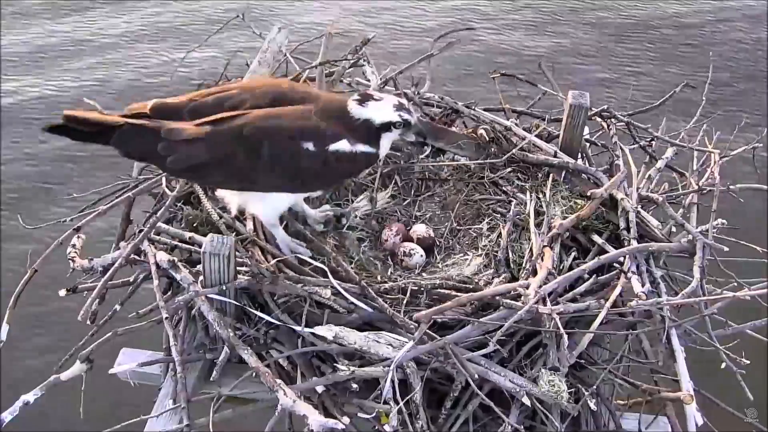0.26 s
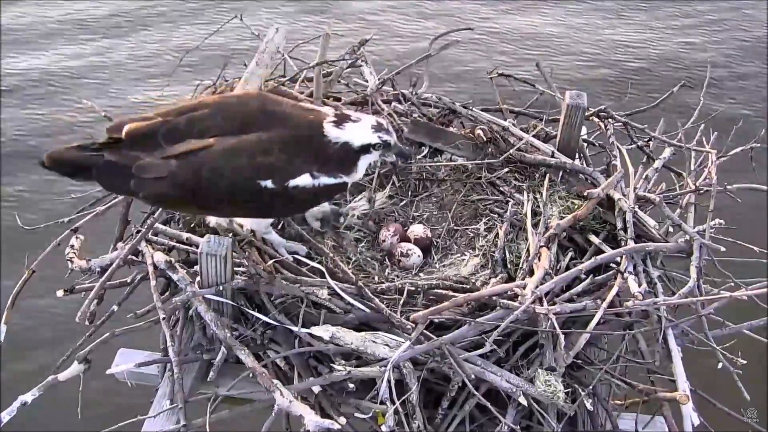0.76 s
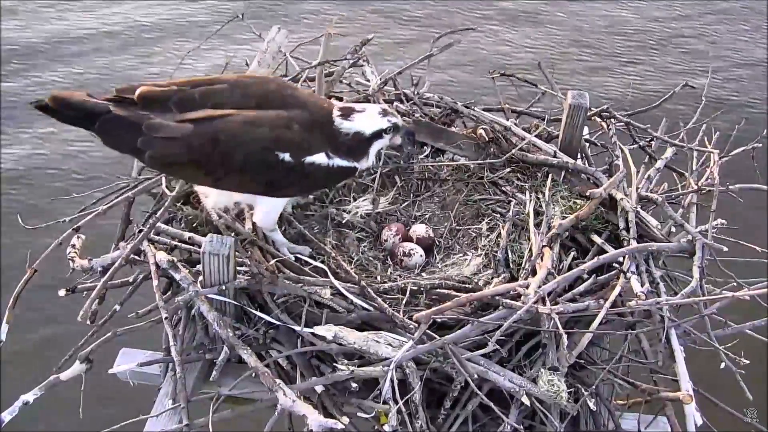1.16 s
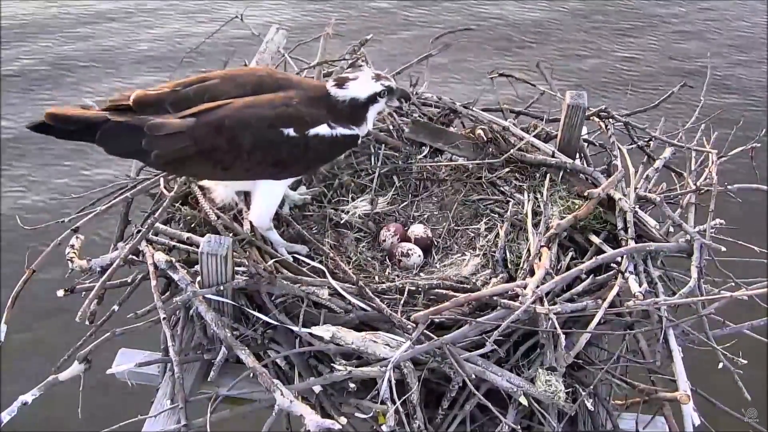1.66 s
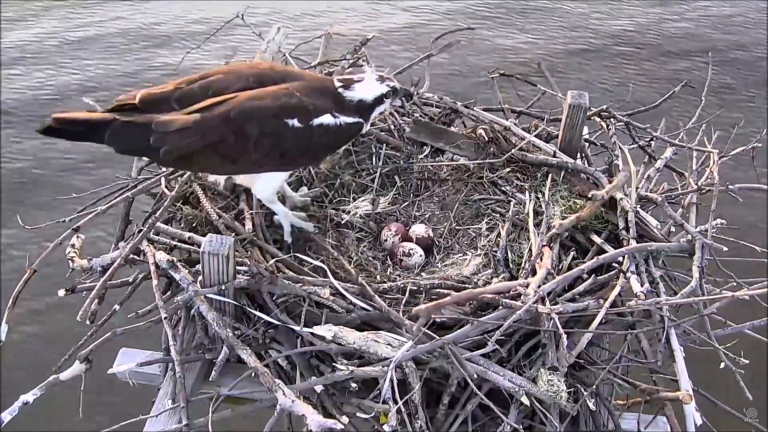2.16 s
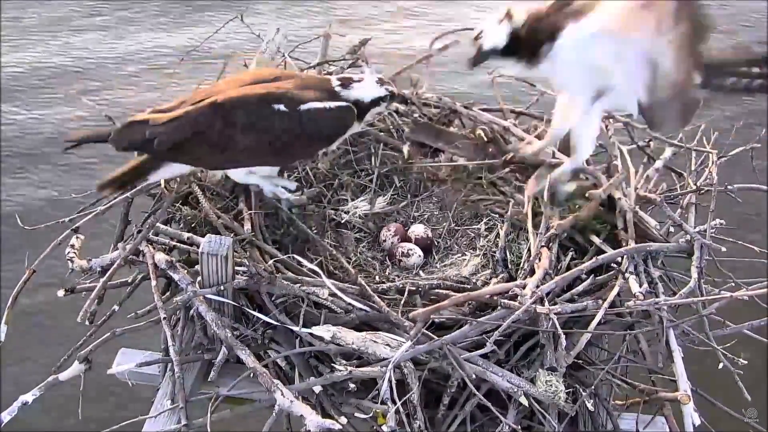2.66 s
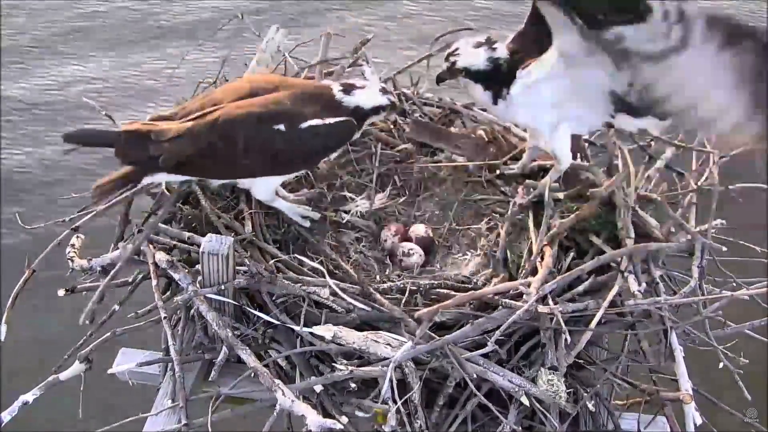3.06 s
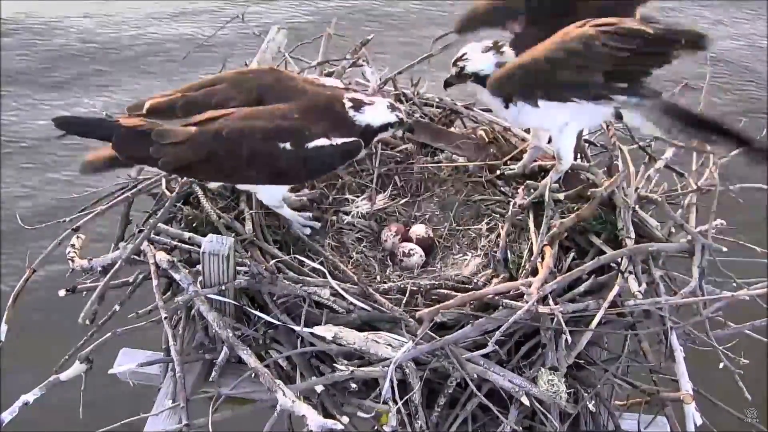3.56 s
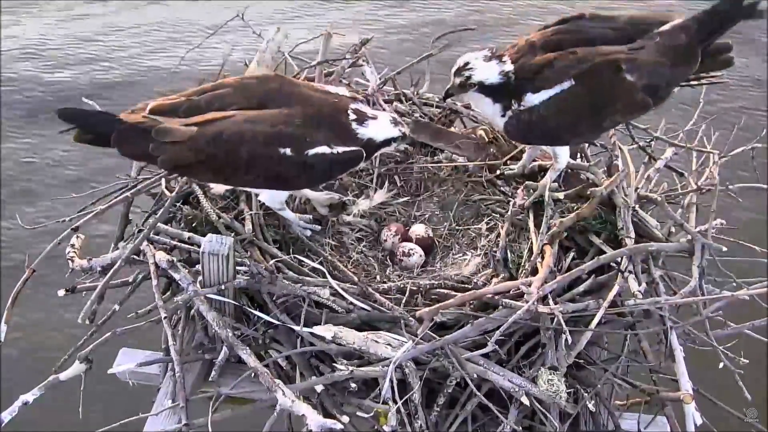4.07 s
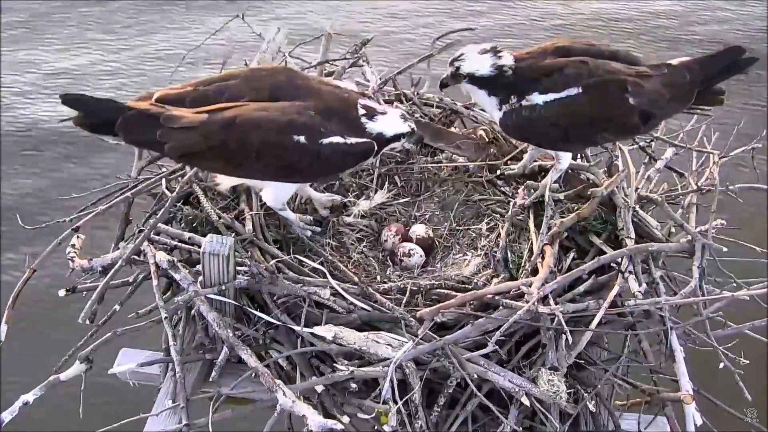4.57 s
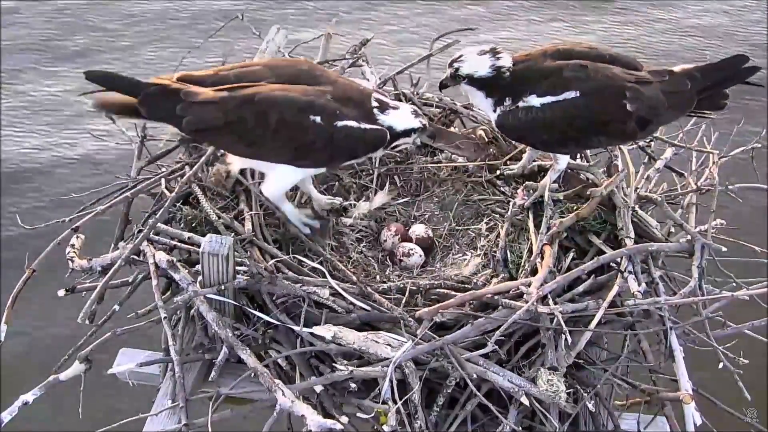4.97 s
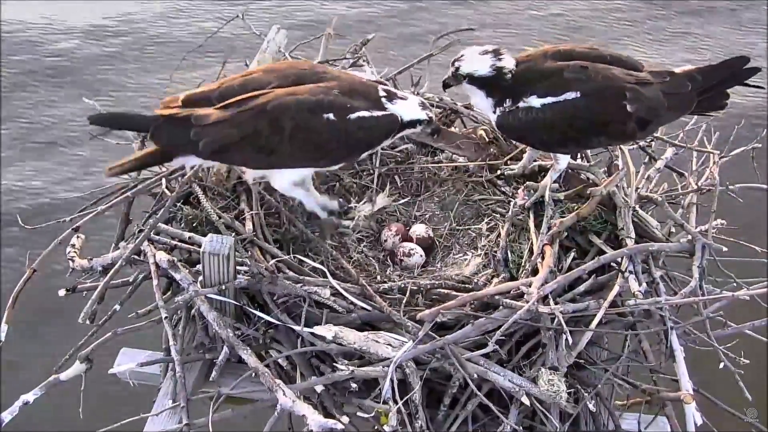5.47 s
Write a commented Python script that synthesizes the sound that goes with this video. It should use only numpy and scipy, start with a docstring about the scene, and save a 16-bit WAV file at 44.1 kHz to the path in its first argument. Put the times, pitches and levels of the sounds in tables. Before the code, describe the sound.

A large bird of prey calls from a stick nest over open water, close and clear. From 0 to about 3.4 s come fourteen high, piercing chirps, evenly spaced at a quarter second. Each lasts about a tenth of a second: a rounded whistle around 2.5-3 kHz, a quick bright downward snap from above 4 kHz, then a short falling close. From 1.5 s the closes turn raspier and higher. A brief soft rustle passes at 0.4 s; from 2.1 to 3.1 s dry sticks and feathers rustle faintly as a second bird lands, with a tiny twig snap at 2.1 s. From 3.5 s seven longer whistles follow, around 0.2 s each, husky, rising, sagging, rising again and dropping, with gaps widening; the last ones, near 5.0 and 5.3 s, are lower. Another small snap comes at 5.2 s. A very quiet dull outdoor wash and faint low hum continue throughout, almost without echo.

```python
"""A bird of prey calls at its stick nest above open water: fast chirps that slow into long whistles.
Each call is a tone bent towards the resonances of the windpipe, with overtones and husky breath.
As a second bird lands, sticks and feathers rustle: filtered noise that swells, plus a few twig snaps.
Behind lie a dull outdoor wash of shaped noise and a faint hum of wavering low tones."""
import sys
import numpy as np
from scipy import signal
from scipy.fft import rfft, irfft, next_fast_len
from scipy.io import wavfile
from scipy.ndimage import uniform_filter1d, map_coordinates

SR = 44100
rng = np.random.default_rng(int(sys.argv[2]) if len(sys.argv) > 2 else 0)


def inscribe(sig):
    """Save sig as 16-bit PCM at rate SR to the path in sys.argv[1].

    A 1-D sig is mono; a 2-D sig holds one channel per row.
    Samples are clipped to [-1, 1] before scaling.
    """
    pcm = np.round(np.clip(np.atleast_2d(sig).T, -1, 1) * 32767)
    wavfile.write(sys.argv[1], SR, pcm.astype(np.int16))


def gain_from_db(level_db):
    """Convert decibel levels to linear amplitude factors (20 dB per decade)."""
    decades = np.asarray(level_db, float) / 20
    return 10 ** decades


N = 251370  # length [samples]


def unit(x):
    """Scales a sound to an rms of 1."""
    return x / np.sqrt(np.mean(x ** 2) + 1e-20)


def along(points, hz):
    """Reads a curve of (frequency [Hz], value) points on a logarithmic frequency axis."""
    f, v = np.transpose(points)
    return np.interp(np.log(hz + 1), np.log(f + 1), v)


def over_time(s, value):
    """Joins values at the times s [s] by straight lines, one value per sample."""
    return np.interp(np.arange(N) / SR, s, value)


def wobble(rate):
    """A smooth random curve with rate random knots a second."""
    knots = rng.standard_normal(int(N * rate / SR) + 4)
    return map_coordinates(knots, [np.arange(N) * rate / SR])


def coloured(x, spectrum):
    """Filters x so that each frequency gets the gain of a (frequency [Hz], level [dB]) curve."""
    m = next_fast_len(N + 8192)  # spare room, so that the end does not wrap round to the start
    gain = gain_from_db(along(spectrum, np.fft.rfftfreq(m, 1 / SR)))
    return irfft(rfft(x, m) * gain, m)[:N]


def outdoors():
    """Far water and wind as shaped noise, with a low hum of tones that waver in level and phase."""
    # balance of the wash: (frequency [Hz], relative level [dB])
    wash_shape = [(90, -27), (164, -15.5), (300, -6.5), (800, -6.5), (1700, -15.5), (4600, -14),
                  (8200, -23), (15800, -22)]
    # tones of the hum: (frequency [Hz], usual peak level [dB])
    hum_tones = [(275, -96.5), (342, -93), (411, -91.5)]
    wash = unit(coloured(rng.standard_normal(N), wash_shape)) * gain_from_db(-80.5 + 1.5 * wobble(3.1))
    t = np.arange(N) / SR
    hum = sum(gain_from_db(db + 1.6 * wobble(15.0)) * np.sin(2 * np.pi * hz * t + wobble(4.6)) for hz, db in hum_tones)
    return wash + hum


def nest():
    """Stick on stick: clumped grains of noise that swell and fade, and a few clear snaps."""
    # loudness of sticks and feathers: (time [s], level [dB])
    rustle = [(0.382, -89), (0.419, -65.5), (0.471, -83.5), (2.102, -76.5), (2.402, -70), (2.948, -70),
              (3.151, -84), (5.7, -94)]
    # how twigs colour the noise: (frequency [Hz], gain [dB])
    twigs = [(1200, -46), (2300, -14), (5300, -7), (9300, -22), (13000, -42.5)]
    # twig snaps: (time [s], level before the crack's lift and the twig colour [dB])
    snaps = [(2.105, -44), (5.164, -39.5)]
    grains = rng.standard_normal(N) * gain_from_db(2.5 * wobble(40) + 3 * wobble(500))
    bed = unit(coloured(grains, twigs)) * gain_from_db(over_time(*np.transpose(rustle)))
    t = np.arange(N) / SR
    crack = gain_from_db(9) * rng.standard_normal(N)
    # each snap starts at once and fades by 60 dB in 4 ms
    snap_levels = sum(gain_from_db(db - 60 * np.abs(t - s) / .004) * (t >= s) for s, db in snaps)
    return bed + coloured(crack * snap_levels, twigs)


def echoes(x):
    """Sticks, post and water give back a short tail: noise that fades by 60 dB in 64 ms."""
    t = np.arange(SR // 4) / SR
    tail = rng.standard_normal(len(t)) * gain_from_db(-60 * t / 0.064) * (t > .002)
    return signal.fftconvolve(x, tail / np.linalg.norm(tail))[:N]


def husk():
    """Breath noise that rings in the resonances of the windpipe, with a grainy level."""
    # resonances that colour the breath: (centre [Hz], width [Hz], level before squaring [dB])
    breath_peaks = [(2354, 230, -4), (3185, 210, 0.5), (3786, 1100, 4.5), (4917, 440, -1.5),
                    (5980, 350, -5)]
    f = np.fft.rfftfreq(N, 1 / SR)
    pipe = sum(gain_from_db(db) * 1j * f * width / (hz * hz - f * f + 1j * f * width)
               for hz, width, db in breath_peaks)
    # the sum is squared in size, and the top is dulled
    response = pipe * np.abs(pipe) / (1 + (f / 6800) ** 8)
    breath = irfft(rfft(rng.standard_normal(N)) * response, N)
    return unit(breath) * gain_from_db(2 * wobble(30))


def slackened(note, next_s):
    """The membrane slackens after a note: a fading tail slides down before the next one starts."""
    s, tension_hz, effort_db = note[-1]
    slack_s = .016  # a full tail; a near next note leaves only a share of it
    share = np.clip((next_s - s - .003) / slack_s, .01, 1)
    tail = (s + slack_s * share, tension_hz * (1 - 0.22 * share), effort_db - 25.5 * share)
    return list(note) + [tail]


def bird(sung):
    """A membrane's whistle, pulled to the windpipe's resonances, with overtones, half-pitch lines and breath."""
    # the windpipe pulls the pitch to its resonances: (tension [Hz], sounding pitch [Hz])
    pull = [(1600, 1600), (2350, 2200), (2400, 2500), (2600, 2830), (3280, 3220), (3430, 3600),
            (3920, 3920), (4030, 4150), (4500, 4450), (6300, 6300)]
    # weak spots between the resonances: (centre [Hz], width [Hz], level [dB])
    gaps = [(2352, 222, -18), (3410, 89, -12), (4087, 56, -15.5)]
    # what throat and beak pass of the overtones: (frequency [Hz], gain [dB])
    throat = [(1500, -29.5), (2200, -7), (4200, 7), (6000, -16.5), (7600, -24.5), (8300, -30), (9000, -43),
              (10000, -69.5)]
    # how much every second cycle differs on the low whistle: (time [s], level [dB])
    doubling = [(0, -9), (2.499, -12.5), (3.203, -16.5), (4.8, -21.5), (5.199, -19), (5.7, -14.5)]
    # huskiness beside the whistle: (time [s], level [dB])
    huskiness = [(0, -24), (0.899, -23.5), (1.6, -19), (2.4, -20.5), (3.2, -19), (3.9, -20), (4.5, -21.5),
                 (4.901, -20.5), (5.7, -22)]

    def smooth(x):
        return uniform_filter1d(x, size=80)

    def partial(order, db):
        gain = gain_from_db(db + along(throat, order * hz) + 3 * wobble(60))
        return gain * np.sin(order * phase)

    followers = sung[1:] + [[(N / SR,)]]
    notes = [slackened(note, after[0][0]) for note, after in zip(sung, followers)]
    s, tension_hz, effort_db = np.transpose(sum(notes, []))
    hz = smooth(np.interp(over_time(s, tension_hz), *np.transpose(pull)))
    # the voice breaks off between the notes
    edges_s = [note[end][0] for note in notes for end in (0, 0, -1, -1)]
    sounding = over_time(edges_s, [0, 1, 1, 0] * len(notes))
    effort = smooth(smooth(gain_from_db(over_time(s, effort_db)) * sounding))
    gap_db = sum(db * np.exp(-((hz - centre) / width) ** 2) for centre, width, db in gaps)
    unsteady = gain_from_db(over_time(*np.transpose(doubling)))
    # an unsteady membrane also flutters in strength
    level = np.sqrt(2) * effort * gain_from_db(gap_db) * gain_from_db(4 * unsteady * wobble(300))
    phase = 2 * np.pi * np.cumsum(hz * (1 + .0025 * wobble(600))) / SR

    overtones = partial(order=2, db=-2.5) + partial(order=3, db=2.5) + partial(order=4, db=-4.0)
    overtones = overtones * np.clip(level / 0.0065, 0, 1) ** .4  # weaker in soft moments
    # every second cycle differs only near the second resonance
    low = unsteady * np.exp(-((hz - 3060) / 200) ** 2)
    halves = partial(order=1 / 2, db=0.0) + partial(order=3 / 2, db=-9) + partial(order=5 / 2, db=5)
    # the loudest moments below the top resonance squeeze the wave: high overtones and a bright hiss
    squeeze = smooth(np.clip(level / 0.019 - 1, 0, 1) * (hz < 3950))
    high = gain_from_db(-7.5) * np.exp(-((hz - 3650) / 500) ** 2) * np.sin(3 * phase)
    high = high + gain_from_db(-23) * np.sin(4 * phase)
    hiss = gain_from_db(-19.0) * unit(np.gradient(rng.standard_normal(N)))
    voice = level * (np.sin(phase) + overtones + low * halves + squeeze * (high + hiss))

    # the breath follows the voice, 2 dB weaker at a pitch below 3350 Hz
    breath_level = uniform_filter1d(level * gain_from_db(-2 * (hz < 3350)), size=300)
    return voice + gain_from_db(over_time(*np.transpose(huskiness))) * breath_level * husk()


def arch(s, rise_s, fall_s):
    """Times through an arch of tension, with the progress (0-1) of its rise and of its fall."""
    rise = np.linspace(0, rise_s, num=13)
    fall = rise_s + np.linspace(0, fall_s, num=25)[1:]
    t = np.concatenate([rise, fall])
    return s + t, np.clip(t / rise_s, 0, 1), np.clip((t - rise_s) / fall_s, 0, 1)


def opening(s, rise_s, fall_s, top_hz, db, lead_db):
    """A chirp's first part: a low lead-in, tension that climbs and may leap, and a fading fall."""
    start_hz, end_hz, leap_hz = 2570, 2450, 3200
    lead_s, lead_hz = 0.016, 2207
    t, up, down = arch(s, rise_s, fall_s)
    # a higher opening leaps late in its rise to the next resonance, and weakens
    held_hz = min(top_hz, leap_hz)
    leap = np.clip((up - .65) / 0.12, 0, 1) * (top_hz > leap_hz)
    bend = .6 if top_hz < leap_hz else 1.1
    climb_hz = (held_hz - start_hz) * np.sin(np.pi / 2 * up) ** bend
    hz = start_hz + climb_hz + (top_hz - held_hz) * leap - (top_hz - end_hz) * down ** 1.8
    fade_db = 23 * (1 - 0.39 * leap) * np.tanh(1.9 * down ** 2.6)
    effort_db = db - 9 * (1 - up) ** 6.4 - 9 * leap - fade_db
    lead = [(s - lead_s, lead_hz, lead_db - 33),  # a soft start
            (s - lead_s / 2, lead_hz, lead_db),
            (s - .002, 1.05 * lead_hz, lead_db)]
    return lead + list(zip(t, hz, effort_db))


def snap_down(s, length_s, lead_s, lead_hz, db, swell_db):
    """A chirp's break: the voice flips up, faint and shaky, then sweeps down loud and drops off."""
    top_hz, end_hz = 4130, 2750
    u = np.linspace(0, 1, num=12)
    hz = lead_hz - (lead_hz - 1.05 * top_hz) * u ** 1.9 + 300 * rng.standard_normal(len(u))
    lead_db = -55.5 - 6 * (1 - u) + 6 * rng.standard_normal(len(u))
    lead = zip(s - .001 - lead_s * (1 - u), hz, lead_db)
    sweep = [(s + 0.0019, top_hz, db - swell_db),
             (s + .7 * length_s, 1.22 * end_hz, db),
             (s + 0.8 * length_s, 1.2 * end_hz, db + 0.5),
             (s + length_s, end_hz, db - 14.0)]
    return list(lead) + sweep


def closing(s, length_s, top_hz, db, tail_db, rasp):
    """A chirp's last part: tension rises quickly, falls slowly and drops to the lowest resonance."""
    end_hz = 2420
    # 0 at the tension of a relaxed arch (2900 Hz), 1 at full strain (1300 Hz above it)
    strain = np.clip((top_hz - 2900) / 1300, 0, 1)
    rise_s = 0.013 * (.75 + 0.39 * strain)
    t, up, down = arch(s, rise_s, length_s - rise_s)
    hz = top_hz - 432 * (1 - up) ** 2.2 - (top_hz - end_hz) * down ** (1.4 - 0.29 * strain)
    effort_db = db - 7 * (1 - up) ** 3.5 - 7.5 * (down ** 1.2 - 0.76 * strain * down)
    # a rasp shakes the tension and the effort; the effort dips further than it rises
    shake = rasp * uniform_filter1d(rng.standard_normal((2, len(t))), size=2)
    hz = hz + 230 * (1 - down) * shake[0]
    effort_db = effort_db + 6 * np.minimum(2 * shake[1], shake[1] / 2)
    return list(zip(t, hz, effort_db)) + [(t[-1] + .004, 2218, tail_db)]


def calls():
    """Arches and whistles sound on one membrane of the voice, the breaks on the other."""
    # Every chirp has three parts: an opening arch, a break that sweeps down, and a closing arch.
    # (time [s], rise [s], fall [s], top tension [Hz], effort [dB], low lead-in [dB])
    opening_arches = [ (0.02, 0.019, 0.052, 2915, -42.5, -66), (0.248, 0.025, 0.036, 2960, -43, -70),
                      (0.493, 0.013, 0.038, 2896, -43, -43), (0.725, 0.023, 0.044, 3114, -44, -46.5),
                      (0.956, 0.021, 0.035, 3122, -40, -41), (1.2, 0.015, 0.035, 2936, -43, -64.5),
                      (1.44, 0.011, 0.044, 3003, -43.5, -51.5), (1.689, 0.0089, 0.044, 2857, -43, -53),
                      (1.932, 0.04, .018, 3327, -39, -71), (2.184, 0.042, 0.014, 3850, -39.5, -67.5),
                      (2.436, .024, 0.027, 2875, -42.5, -66), (2.703, .026, 0.021, 3455, -40, -45.5),
                      (2.958, 0.027, 0.023, 3830, -41.5, -82), (3.221, 0.036, 0.028, 4080, -38, -62.5)]
    # (time [s], length [s], husky lead [s], lead tension [Hz], effort [dB], swell [dB])
    breaks = [ (0.094, 0.011, .005, 4700, -41.5, -1), (0.315, 0.036, .008, 5128, -37.5, -2),
              (0.552, 0.033, .006, 5000, -39.5, -4.5), (0.798, 0.012, .004, 4600, -43, 4),
              (1.03, 0.02, .014, 5870, -32, 9), (1.264, 0.031, .016, 5535, -35.5, 9),
              (1.526, 0.019, .036, 5600, -35.5, 7.5), (1.773, 0.022, .014, 5570, -33.5, 7.5),
              (2.024, .02, .016, 5490, -32, 8.5), (2.266, .02, .008, 5217, -32.5, 15),
              (2.542, 0.013, .03, 5010, -37.5, -1), (2.794, .012, .008, 5200, -31.5, 10.5),
              (3.055, 0.014, .02, 4690, -36, 1), (3.299, 0.029, .02, 4580, -37.5, 1.5)]
    # (time [s], length [s], top tension [Hz], effort [dB], low tail [dB], rasp [0-1])
    closing_arches = [ (0.107, 0.034, 2880, -38, -47, 0), (0.349, 0.037, 2976, -37, -46, .1),
                      (0.586, 0.036, 2916, -39.5, -48, 0.13), (0.816, 0.039, 3252, -35.5, -48, 0.02),
                      (1.056, 0.035, 3010, -36.5, -42.5, 0.26), (1.298, 0.036, 3090, -37, -48.5, 0.27),
                      (1.551, 0.049, 3327, -39.5, -49, 0.94), (1.791, 0.056, 4200, -36, -50, 0.87),
                      (2.043, 0.05, 4200, -35.5, -57, .8), (2.286, .053, 4080, -41, -64, 0.98),
                      (2.559, 0.044, 3303, -35.5, -48.5, 0.73), (2.809, 0.052, 4210, -43, -51.5, 0.93),
                      (3.068, 0.056, 4193, -37.5, -51, 0.54), (3.331, 0.055, 4453, -37.5, -47, .5)]
    # long whistles, two humps with a sag between, each a list of (time [s], tension [Hz], effort [dB])
    whistles = [
        [(3.47, 2375, -56), (3.478, 2700, -46.5), (3.492, 3200, -38), (3.497, 3700, -43), (3.512, 4080, -41.5),
         (3.535, 3850, -51), (3.542, 2630, -66.5), (3.57, 2690, -49.5), (3.586, 4270, -42), (3.606, 4336, -40),
         (3.622, 3580, -36), (3.642, 2486, -46), (3.65, 2420, -72)],
        [(3.722, 2223, -52.5), (3.745, 3560, -39), (3.759, 4265, -39), (3.812, 4090, -51.5), (3.857, 4510, -35),
         (3.871, 4450, -38), (3.903, 2610, -43.5), (3.911, 2480, -69)],
        [(3.996, 2400, -73), (4.002, 2745, -48.5), (4.011, 3400, -42), (4.033, 4330, -45), (4.079, 4130, -46),
         (4.133, 4400, -36), (4.159, 3540, -46.5), (4.172, 2640, -41), (4.181, 2390, -75)],
        [(4.275, 2500, -62), (4.283, 2950, -43.5), (4.293, 3570, -43.5), (4.317, 3890, -47.5),
         (4.345, 3420, -41), (4.37, 3400, -42.5), (4.41, 3900, -46), (4.451, 4506, -36.5), (4.485, 3470, -43.5),
         (4.503, 2560, -44), (4.51, 2450, -63), (4.535, 1837, -70)],
        [(4.604, 2630, -51.5), (4.616, 3480, -46.5), (4.645, 4026, -46), (4.68, 3410, -42.5),
         (4.698, 3390, -48.5), (4.723, 3655, -39.5), (4.741, 3600, -46), (4.755, 2960, -41),
         (4.772, 2560, -43.5), (4.788, 2450, -69)],
        [(4.968, 2500, -50), (4.998, 3330, -40), (5.005, 3480, -46.5), (5.032, 3175, -40), (5.067, 3110, -40.5),
         (5.099, 3324, -41), (5.109, 3600, -38.5), (5.147, 3784, -37.5), (5.182, 2553, -40.5),
         (5.195, 2450, -63)],
        [(5.311, 2550, -53), (5.325, 2770, -43), (5.345, 3510, -46), (5.361, 3475, -44), (5.389, 3030, -45),
         (5.415, 3100, -46.5), (5.449, 3593, -42.5), (5.485, 3580, -45.5), (5.505, 2750, -35),
         (5.529, 2525, -38.5), (5.533, 2080, -51), (5.545, 1847, -67.5), (5.562, 1790, -75)],
    ]
    arches = []
    for first, last in zip(opening_arches, closing_arches):
        arches += [opening(*first), closing(*last)]
    return bird(arches + whistles) + bird([snap_down(*row) for row in breaks])


def scene():
    """Everything at one microphone: the calls with a faint echo, the nest and the outdoors."""
    voice = calls()
    return (voice + gain_from_db(-22) * echoes(voice) + nest() + outdoors())[None]


def band_limit(x):
    """A steep low-pass at the top of the band."""
    return signal.sosfilt(signal.butter(12, 15960, fs=SR, output="sos"), x)


def record(dry):
    """A slightly lopsided microphone adds a little of the squared sound, which thumps with loud notes."""
    lopsided = 0.55 * dry ** 2
    thumps = lopsided - uniform_filter1d(lopsided, size=350)  # without its slow drift
    return band_limit(dry + thumps)


dry = scene()
out = record(dry)
inscribe(out)
```